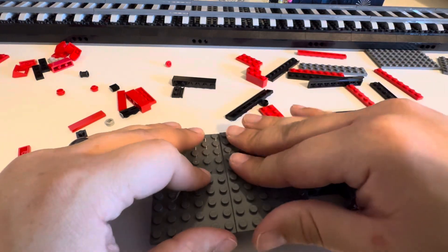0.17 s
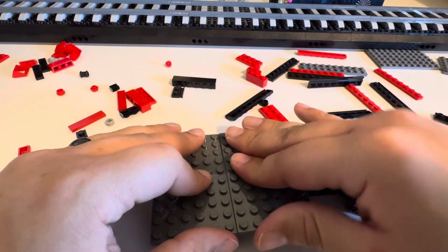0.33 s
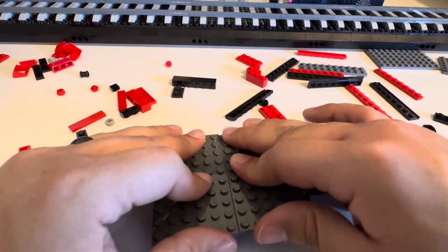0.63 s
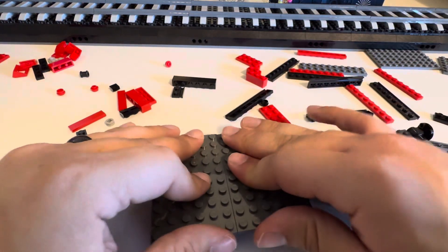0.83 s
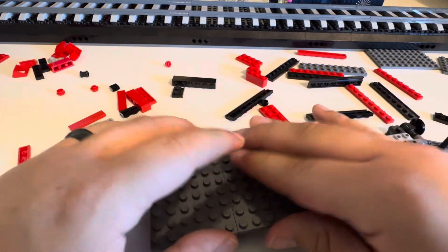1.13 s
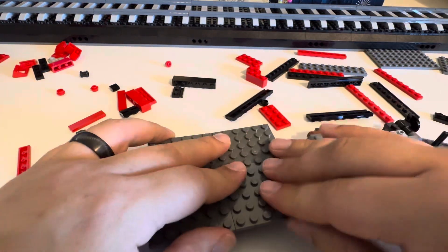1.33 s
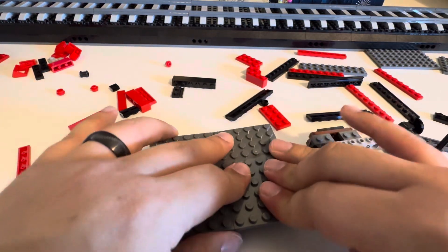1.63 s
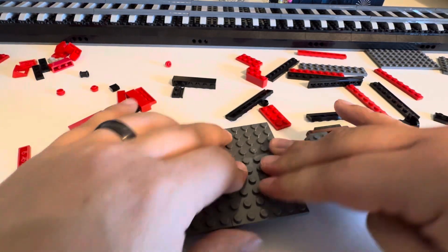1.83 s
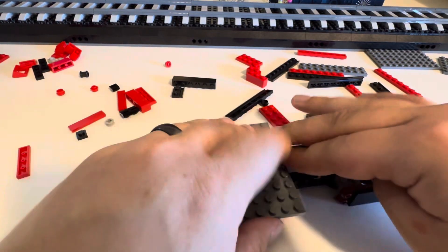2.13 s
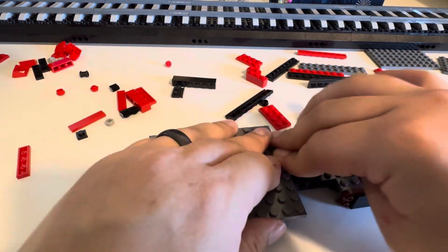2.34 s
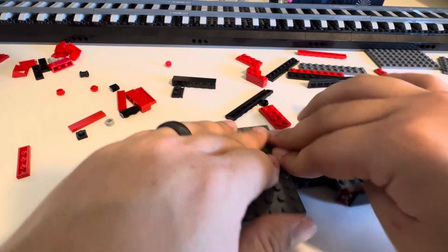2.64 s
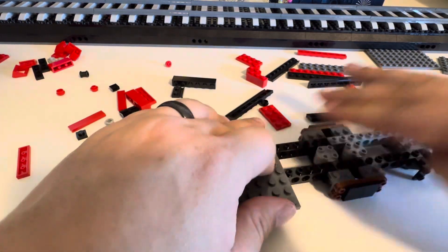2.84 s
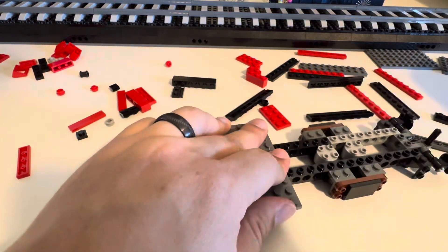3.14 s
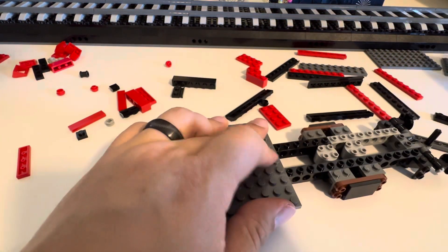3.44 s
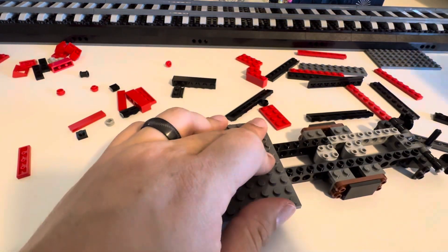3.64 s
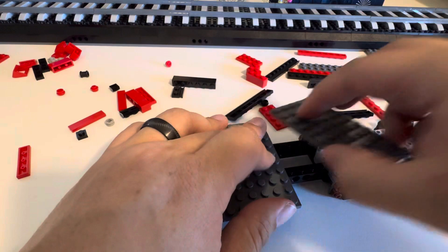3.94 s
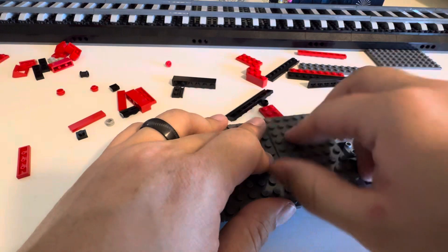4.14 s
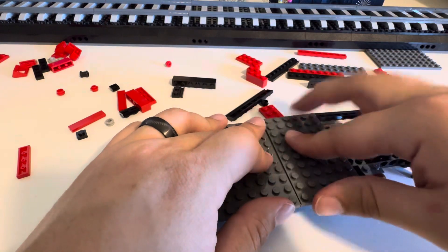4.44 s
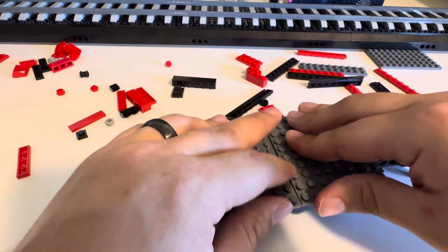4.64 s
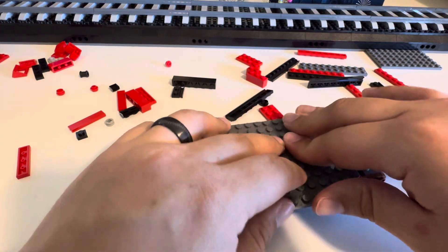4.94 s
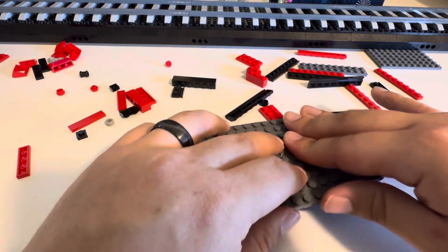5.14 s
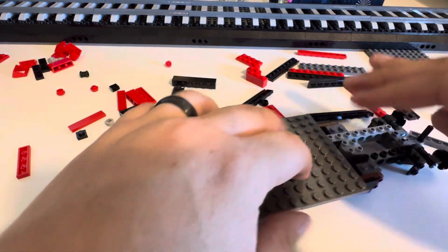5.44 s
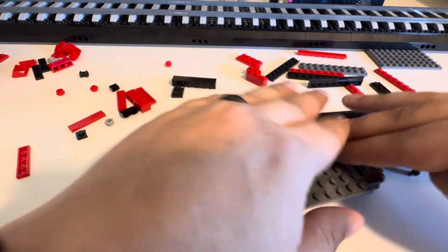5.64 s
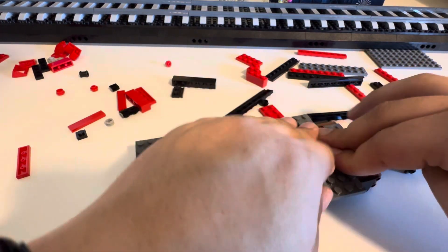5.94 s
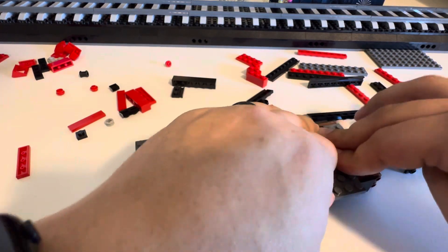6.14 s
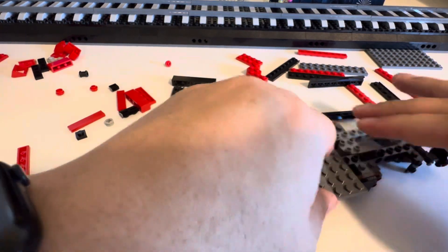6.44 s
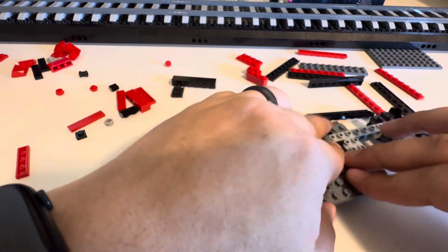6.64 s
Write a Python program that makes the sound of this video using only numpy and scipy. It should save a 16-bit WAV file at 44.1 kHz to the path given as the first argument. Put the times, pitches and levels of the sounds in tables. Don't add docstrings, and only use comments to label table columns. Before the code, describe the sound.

Fingers rub and shift hard plastic pieces on a hollow tabletop. A tiny squeak leads into a bright, startling crack and boom, answered briefly by the walls. Scattered ticks and taps continue quietly until another plate clacks down in a quick cluster, followed by a duller press, a table knock and fading light clicks. Close, dry stereo pickup, quiet indoor background.

```python
import sys
import numpy as np
from scipy import signal
from scipy.fft import rfft, irfft
from scipy.io import wavfile
from scipy.ndimage import uniform_filter1d, minimum_filter1d

SR = 44100
rng = np.random.default_rng(int(sys.argv[2]) if len(sys.argv) > 2 else 0)


def store_wav(level_fs):
    pcm = np.round(np.clip(np.atleast_2d(level_fs), -1, 1) * 32767)
    wavfile.write(sys.argv[1], SR, pcm.T.astype(np.int16))


def natural_amplitude(level_db):
    exponent = np.asarray(level_db, float) / 20
    return 10 ** exponent


N = 299439

# f/Hz, level/dB, t60/s
PLATE = [(583, 9, 0.017), (552, -6.5, 0.067), (771.5, -2.5, 0.0043), (1086.5, 5.5, 0.024),
         (1352, 2.5, 0.016), (1566, -0.5, 0.017), (1970, 0, 0.019), (2275, -5, 0.054)]
# f/Hz, level/dB, t60/s
TABLE = [(63.6, -12, 0.28), (102, 5, 0.21), (116.15, 0.5, 0.54), (196.4, 0, 0.12), (276, 6, 0.2),
         (310, -2, 0.19), (383, 1.5, 0.19), (457, -7, 0.33)]
# t/s, level/dB
CRACKS = [
    (0.6278, 23),
    (4.103, 8.5),
    (4.812, -1),
]


def evened(x):
    return x / np.sqrt(np.mean(x ** 2) + 1e-20)


def read(points, hz):
    f, value = np.transpose(points)
    return np.interp(np.log(hz + 1), np.log(f + 1), value)


def colour(x, points):
    gain = natural_amplitude(read(points, np.fft.rfftfreq(x.shape[-1], 1 / SR)))
    return irfft(rfft(x) * gain, x.shape[-1])


def add(mix, s, sound):
    part = mix[:, max(round(s * SR), 0):][:, :sound.shape[-1]]
    part += sound[..., :part.shape[1]]


def above(x, edge_hz):
    return signal.lfilter(*signal.butter(2, edge_hz, "high", fs=SR), x)


def near(modes, tone_hz, slope_db):
    return -slope_db * abs(np.log2(np.transpose(modes)[0][:, None] / tone_hz))


def ring(modes, draw, detune, spread_db, extra_db=0, length=1):
    hz, db, t60 = np.transpose(modes)[:, :, None]
    t = np.arange(SR // 4) / SR
    for_level, for_pitch = draw[:, :, None]
    decay_db = 60 * t / (t60 * max(length, .1))
    level = natural_amplitude(db + extra_db + spread_db * (2 * for_level - 1) - decay_db)
    tones = np.sin(2 * np.pi * hz * (1 + detune * (2 * for_pitch - 1)) * t)
    return (level * tones).sum(0), t


def floor():
    # f/Hz, level/dB
    air_colour = [(18, -49), (30, 13), (118, 6.5), (158, -3.5), (241, -3.5), (747, -14.5), (4980, -22.5),
                  (7020, -36.5), (9890, -25), (14700, -29), (16300, -34)]
    # f/Hz, correlation
    likeness = [(60, 0.92), (380, -0.16), (2380, -0.04), (15000, 0.74)]
    left, other = rfft(rng.standard_normal((2, N)))
    hz = np.fft.rfftfreq(N, 1 / SR)
    same = np.clip(read(likeness, hz), -1, 1)
    right = same * left + np.sqrt(1 - same ** 2) * other
    air = np.array([left, right]) * natural_amplitude(read(air_colour, hz))
    return natural_amplitude(-74 + 8.0) * evened(irfft(air, N))


def room(x):
    # f/Hz, level/dB
    wall_shine = [(2400, 0), (3200, 2.5)]
    # f/Hz, t60/s
    dying = [(80, 0.25), (210, 0.44), (560, 0.3), (1470, 0.44), (3880, 0.47), (7000, 0.35), (11000, 0.45)]
    # f/Hz, level/dB
    wall_tone = [(45, -16), (100, 8.5), (500, 4.5), (1100, 1.5), (2000, -4.5), (3500, -7.5), (6500, -3.5),
                 (9000, -4.5), (11000, -19.5), (15000, -18.5)]
    out, count = np.zeros((2, N)), SR // 2 // 20
    sources = [x[0], x[1], x.mean(0)]
    for k in range(3):
        taps = np.zeros((2, SR // 2 + 600))
        at = 420 + np.arange(count) * 20 + rng.integers(0, 20, (2, count))
        strength = 1 - 0.07 * np.exp((420 - at) / 440.0)
        np.put_along_axis(taps, at, rng.choice([-1., 1.], at.shape) * strength, 1)
        hz, t, z = signal.stft(taps, SR, nperseg=256)
        z *= natural_amplitude(read(wall_shine, hz))[:, None]
        same = read([(100, .85), (300, .4), (700, -.5), (1300, .2), (2400, -.1)], hz)[:, None]
        z[1] = same * z[0] + np.sqrt(1 - same ** 2) * z[1]
        level_db = read(wall_tone, hz)[:, None] - 60 * t / read(dying, hz)[:, None]
        tail = signal.istft(z * natural_amplitude(level_db), SR, nperseg=256)[1]
        tail = tail / np.linalg.norm(tail[0])
        turn = np.sqrt(2 / 3) * np.cos(np.pi * (np.arange(N) / SR * 3.3 + k / 3))
        out += signal.fftconvolve((turn * sources[k])[None], tail, axes=1)[:, :N]
    return out


def crack():
    # f/Hz, level/dB
    crack_colour = [(500, -33.5), (1400, -12.5), (2200, -11.5), (3000, -3.5), (4500, -6.5), (6500, -11.5),
                    (9000, -10.5), (12000, -17)]
    out = np.zeros((2, N))
    pulse = colour(1. * (np.arange(1024) == 512), crack_colour)
    for s, db in CRACKS:
        add(out, s - 512 / SR, natural_amplitude(db) * pulse)
    return out


def thuds():
    # t/s, peak level/dB, strongest tone f/Hz, ring length/factor
    blows = [(0.387, -63.5, 410, 1), (0.64, -15, 298, 0.58), (0.638, -15.5, 96.9, 0.52),
             (1.058, -33, 286, 1), (1.178, -42, 95.5, 0.45), (1.296, -33.5, 93, 0.55),
             (1.592, -31.5, 113, 0.77), (1.794, -38, 114, 1), (1.926, -34, 276, 1),
             (2.179, -34.5, 90, 0.57), (2.209, -31, 85.3, 0.19), (2.442, -42, 310, 1), (2.69, -38, 393, 1),
             (2.766, -28, 286, 0.64), (2.989, -42, 116.4, 0.14), (3.317, -48.5, 77.8, 0.98),
             (3.389, -39, 111, 1), (3.43, -40, 287, 1), (4.007, -53.5, 396, 0.9), (4.101, -20, 285, 0.71),
             (4.326, -36.5, 111.8, 0.37), (4.441, -42, 109, 0.31), (4.811, -11, 234, 0.39),
             (5.199, -32, 310, 0.81), (5.238, -35.5, 113, 1), (5.638, -20, 269.5, 0.89),
             (6.049, -41, 315, 1), (6.174, -44, 120, 0.94), (6.297, -33, 322, 1), (6.326, -35, 119, 0.97),
             (6.568, -29.5, 118, 0.47)]
    swell_cycles = 0.22
    out = np.zeros((2, N))
    for (s, db, tone_hz, length), draw in zip(blows, rng.random((len(blows), 2, len(TABLE)))):
        boom, t = ring(TABLE, draw, 0.06, 3.5, near(TABLE, tone_hz, 6), length)
        boom *= 1 - np.exp(-t * tone_hz / swell_cycles)
        add(out, s, natural_amplitude(db - 1.5) * boom / abs(boom).max())
    return out


def strokes():
    # start t/s, length/s, force level/dB, weight on the table/dB, skin sliding/dB
    drags = [(-.05, 0.066, -43.5, -8.5, -9), (0.302, 0.27, -69, 5, -16.5), (0.757, 0.25, -51.5, 2, -5),
             (1.043, 0.091, -52, -3.5, 8), (1.289, 0.13, -65.5, 6, 13), (1.508, 0.19, -64, 3, 6.5),
             (1.768, 0.18, -55.5, -6.5, -2), (1.994, 0.14, -53, 2.5, 0.5), (2.244, 0.45, -60, -9.5, 0.5),
             (2.634, 0.17, -49.5, -10.5, -3), (2.893, 0.38, -61.5, -9.5, 4), (3.329, 0.11, -58, -3.5, 4.5),
             (4.153, 0.092, -59.5, -2, 10), (4.318, 0.69, -67.5, 4, -16), (4.851, 0.42, -65, 0, 0),
             (5.168, 0.19, -53.5, -1.5, 2.5), (5.388, 0.09, -58.5, 4.5, -14.5),
             (5.703, 0.24, -70.5, 7.5, 6.5), (5.912, 0.19, -61.5, -1, -3), (6.157, 0.2, -65, 2, -0.5),
             (6.269, 0.089, -54, 6, -9.5), (6.444, 0.13, -51.5, -15.5, 1.5),
             (6.667, .15, -56.5, -15, -11.5)]
    grip_s, let_go_s, skin_all_db = .02, 0.063, -20.5
    start, length, db, weight_db, skin_db = np.transpose(drags)[:, :, None]
    t = np.arange(0, N + 256, 256) / SR
    grip = np.clip((t - start) / grip_s, 0, 1)
    shape = grip * np.exp(-np.maximum(t - start - length, 0) / let_go_s)
    shares = weight_db, 0, skin_db + skin_all_db
    return [np.interp(np.arange(N) / SR, t, (shape * natural_amplitude(db + share)).sum(0)) for share in shares]


def slips(per_s, spread_db, clump_db):
    clumps = evened(uniform_filter1d(uniform_filter1d(rng.standard_normal(N), 500), 500))
    size = natural_amplitude(spread_db * np.minimum(rng.exponential(1, N), 4) + clump_db * clumps)
    return size * rng.choice([-1., 1.], N) * (rng.random(N) < per_s / SR)


def drag():
    # f/Hz, level/dB
    skin_colour = [(1650, -30), (2800, -7), (3730, -2.5), (9520, -16.5), (11300, 4.5), (12700, -17),
                   (14100, -2), (15300, -23), (16300, -55.5)]
    load, scrape, rub = strokes()
    still = np.full((2, len(PLATE)), .5)
    table_ring = ring(TABLE, still, 0, 0, near(TABLE, 100, 0.87), 0.18)[0]
    table = evened(signal.oaconvolve(slips(1500, 1.3, 2.7), table_ring)[:N])
    table = colour(table, [(420, 1.5), (700, -20.5)])
    plate_ring = ring(PLATE, still, 0, 0, near(PLATE, 570, 1.0), 0.23)[0]
    middle, side = [evened(signal.oaconvolve(slips(2700, 0.92, 3.7), plate_ring)[:N]) for _ in range(2)]
    plate = 0.47 * middle + np.outer([.5, -.5], side)
    middle, side = [evened(colour(slips(7000, 3, 2.5), skin_colour)) for _ in range(2)]
    hiss = natural_amplitude(4.0) * rub * (middle + np.outer([.4, -.4], side))
    return load * table + scrape * plate + hiss


def pings():
    # t/s, peak level/dB, f/Hz, t60/s
    bricks = [(1.03, -66, 2140, 0.36), (1.058, -48.5, 3100, 0.036), (1.416, -46.5, 3250, .035),
              (1.952, -50, 1282, 0.13), (4.012, -49.5, 2450, 0.11), (4.125, -35, 4080, .012),
              (4.148, -25, 4200, .012), (4.213, -28.5, 1697, 0.028), (4.812, -28, 1140, .07),
              (5.235, -47.5, 1015, 0.2), (6.47, -48, 572, .08), (6.557, -45.5, 556.4, 0.046),
              (5.629, -45, 4960, .02), (5.697, -43.5, 3080, 0.037), (6.47, -52, 4555, 0.026),
              (6.59, -56, 2820, 0.045)]
    out, t = np.zeros((2, N)), np.arange(SR // 4) / SR
    for (s, db, hz, t60), noise in zip(bricks, rng.standard_normal((len(bricks), len(t)))):
        wobble = 1 + .5 * evened(uniform_filter1d(noise, 150))
        level = natural_amplitude(db - 60 * t / max(t60, .005)) * (1 - np.exp(-t / 0.00091))
        add(out, s, level * wobble * np.sin(2 * np.pi * hz * t))
    return out


def rising_tone():
    end_s, rising_hz, rising_db, grows_s = .6262, 1770, -14.5, 0.0032
    out, t = np.zeros((2, N)), np.arange(-900, 40) / SR
    swell = np.exp(np.minimum(t, 0) / grows_s) * np.clip(1 - t * SR / 40, 0, 1)
    turns = 2 * np.pi * rising_hz * t
    tone = np.sin(turns) + natural_amplitude(-27.5) * np.sin(3 * turns) + natural_amplitude(-30.0) * np.sin(4.3 * turns)
    add(out, end_s + t[0], natural_amplitude(rising_db) * swell * tone)
    return out


def knocks():
    # t/s, peak level/dB, strongest upper tone f/Hz, whole-plate flexing/dB, contact/ms
    seatings = [(0.637, -31, 2017, -22, 2), (0.6258, 0, 1395, -5, 0.95), (0.644, -19, 1130, 1.5, 2.14),
                (4.083, -24.5, 1513, 0.5, 2.7), (4.1012, -7.5, 1100, -10, 1.2), (4.112, -23, 780, -4, 1.6),
                (4.12, -32, 780, 0.5, 1.36), (4.127, -25, 1790, -10, 1.6), (4.147, -18, 1933, -16.5, 1.4),
                (4.212, -33, 1803, -18, 1.53), (4.811, -16.5, 1080, 2.5, 1.91),
                (5.622, -40.5, 769, 1, 1.86), (5.628, -20.5, 1530, -4.5, 2.96),
                (5.634, -29.5, 1114, 0, 2.43), (5.652, -28, 600, -2, 3.3), (5.645, -32.5, 1070, 3, 3),
                (6.207, -33, 1360, 1, 1.92)]
    # t/s, peak level/dB
    pushes = [(0.335, -60), (0.396, -53), (1.05, -46), (1.287, -49), (1.299, -37), (1.589, -41.5),
              (1.784, -45), (1.919, -57), (2.017, -46), (2.064, -55), (2.435, -54.5), (2.666, -44.5),
              (2.683, -43.5), (2.749, -46), (4.01, -42.5), (4.11, -44), (4.328, -50.5), (4.847, -56.5),
              (5.192, -46), (5.234, -48), (5.436, -47), (6.043, -43), (6.18, -52), (6.281, -41.5),
              (6.47, -51), (6.557, -40)]
    # t/s, peak level/dB
    nudges = [(0.147, -47), (1.028, -52), (1.06, -37), (1.35, -48), (1.498, -46.5), (2.111, -37),
              (2.166, -44.5), (2.625, -43), (2.763, -36.5), (4.402, -47.5), (4.441, -42), (5.912, -50),
              (6.3, -41), (6.686, -46)]
    # t/s, peak level/dB, strongest upper tone f/Hz
    edge_taps = [(0.422, -41, 1240), (1.143, -47.5, 1090), (1.414, -41, 939), (1.85, -47, 1530),
                 (1.951, -51.5, 1260), (2.19, -45, 936), (2.253, -50, 1056), (2.329, -45, 1080),
                 (2.973, -66, 2236), (3.347, -63.5, 2395), (3.362, -52.5, 1450), (3.392, -46.5, 1795),
                 (4.717, -49.5, 1100), (5.129, -56.5, 1153), (5.332, -56, 1060), (5.391, -45.5, 2380),
                 (5.452, -42.5, 883), (5.953, -40.5, 1457), (5.969, -37.5, 1110), (5.993, -41, 1085),
                 (6.751, -52, 2370)]
    flat_hz = 1040
    firm = 0.039
    rows = seatings + [(*row, flat_hz, 7, 3.9) for row in pushes]
    rows += [(*row, flat_hz, -1, 3.4) for row in nudges] + [(*row, -21, 2.4) for row in edge_taps]
    out = np.zeros((2, N))
    whole = np.arange(8)[:, None] < 2
    for (s, db, tone_hz, flex_db, ms), draw in zip(rows, rng.random((len(rows), 1016))):
        mode_db = np.where(whole, flex_db - 3, near(PLATE, tone_hz, 8))
        plate, t = ring(PLATE, draw[:16].reshape(2, 8), .06, 3, mode_db, .7)
        u = 1000 * t[:1000] / np.clip(ms, .3, 8)
        jolts = (draw[16:] - .5) ** 3 + firm * np.exp(-((u - .5) / .06) ** 2)
        contact = np.convolve(jolts * u * np.exp(-u), np.hanning(11))
        plate = signal.fftconvolve(plate[:4096], contact)
        add(out, s - .001, natural_amplitude(db + 3.5 + max(flex_db, 0)) * plate / abs(plate).max())
    return out


def ticks():
    # t/s, peak level/dB, ring f/Hz, left-right/dB
    sharp = [(1.1453, -33, 3600, 4.5), (1.3453, -40.5, 8190, 1), (1.8567, -36, 5090, 3),
             (1.9031, -59, 5420, 6), (1.916, -45, 3850, 7), (2.0637, -47.5, 3860, 3),
             (2.1924, -42.5, 2730, 0), (3.3448, -33.5, 3350, 10.5), (4.5476, -56, 5280, -1),
             (5.7104, -48.5, 4370, 0.0), (6.1769, -60, 3110, 1), (6.3475, -45.5, 2690, -3)]
    # t/s, peak level/dB, ring f/Hz, left-right/dB
    crisp = [(0.6262, 5, 5280, 6.5), (4.1022, -6, 6260, -5), (0.4204, -38.5, 5730, 2.5),
             (1.0261, -37, 2460, 4.5), (1.1453, -41, 3500, 2), (1.2845, -44, 3750, 6.0),
             (1.3179, -43, 2790, 3), (1.5893, -43, 4140, 9), (1.6676, -53, 3750, 5.5),
             (1.8028, -45, 4930, 1.5), (2.0154, -56, 2500, 4), (2.2518, -48, 3750, 4.5),
             (2.6774, -43, 3670, 3.5), (2.9741, -48.5, 2552, 10), (3.5144, -50, 2600, -6),
             (4.0088, -34.5, 2550, 0.5), (4.1275, -17.5, 3040, -2), (4.1465, -21.5, 2570, 3.5),
             (4.6049, -52, 2680, 4), (4.8115, -19.5, 3670, -1), (5.0903, -56.5, 2630, 2),
             (5.219, -36, 7200, -1.5), (5.2304, -40.5, 3250, 1.5), (5.6136, -42.5, 2680, -1),
             (5.9708, -57, 2590, -1.5), (6.2063, -35.5, 2610, 2.0), (6.334, -48, 2690, -1.0)]
    # t/s, peak level/dB, ring f/Hz, left-right/dB
    soft = [(0.145, -54, 3530, 7.5), (0.3985, -55.5, 2510, 3.5), (1.297, -35, 3740, 3),
            (1.4126, -40.5, 3300, 7), (1.4935, -44.5, 5020, 6.5), (2.1131, -49, 2500, 4),
            (2.3295, -51, 5230, 5.5), (2.6184, -42, 4360, 6.5), (2.6527, -48.5, 2500, 5),
            (2.745, -50, 2500, 1.0), (2.7613, -43.5, 2540, 3), (3.2919, -70, 2610, 0.0),
            (3.3613, -30, 3500, 7), (3.3922, -44.5, 4310, -1), (4.1269, -27, 3100, 15),
            (4.4363, -48, 2500, 8.5), (4.6922, -58, 3710, 6.5), (4.7167, -49, 2940, -2),
            (4.9569, -55.5, 2530, 2.5), (5.1883, -46.5, 2910, 9), (5.3892, -47.5, 2460, 9),
            (5.644, -37.5, 2710, 0.0), (5.695, -35, 3010, 1.5), (5.9555, -52.5, 2610, 1.5),
            (6.4702, -50.5, 4410, 19), (6.5542, -48.5, 2670, -5.5)]
    # t/s, peak level/dB, ring f/Hz, left-right/dB
    dull = [(1.0463, -40, 2470, 9), (4.0821, -24.5, 3650, -4.5), (4.2107, -41, 2660, 6),
            (5.4488, -55, 2520, 0.5), (5.6276, -39.5, 2690, 1.5), (6.2829, -45, 2920, 12),
            (6.6833, -46.5, 4100, 3), (6.7314, -56, 3440, 7), (6.7508, -43.5, 2430, 10),
            (6.769, -55.5, 2460, 14)]
    # f/Hz, level/dB
    snap_colour = [(1060, -35.5), (1800, -8), (3400, -12), (4700, -16.5), (7800, -27.5), (11500, -11.5),
                   (15000, -18.5), (16600, -17.5)]
    ring_db, ring_oct = 7.5, 0.082
    out, t = np.zeros((2, N)), (np.arange(2048) - 512) / SR
    kinds = (sharp, 8), (crisp, -0.43), (soft, -5), (dull, -15)
    rows = [(*row, bright_db) for table, bright_db in kinds for row in table]
    for (s, db, ring_hz, pan_db, bright_db), noise in zip(rows, rng.standard_normal((len(rows), 2, 2048))):
        u = t / (.0028 * natural_amplitude(1.0 * noise[0, 0] - .3 * (db + 36))) - .2
        build_up = np.exp(1.5 * np.minimum(u - .7, 0))
        shape = np.where(u < .7, build_up, np.exp(.7 - u) + .06 * np.exp(-t / .008))
        own = colour(noise[1], [(1500, -27.5), (2500, -4), (7000, 2), (9000, -25.5)])
        burst = shape * (noise[0] + np.outer([1, -1], own))
        burst = colour(colour(burst, snap_colour), [(5000, 0.0034), (9000, bright_db + 7.0)])
        skirt = 2 ** (2 * ring_oct)
        burst = colour(burst, [(ring_hz / skirt, 0), (ring_hz, ring_db), (ring_hz * skirt, 0)])
        left, right = [colour(burst[k], [(6000, side * pan_db), (8000, 0.0015)])
                       for k, side in enumerate((.5, -.5))]
        burst = np.array([left, right])
        add(out, s - 512 / SR, natural_amplitude(db + 4.0) * burst / abs(burst).max())
    return out


def ports(x):
    # f/Hz, phase/rad
    lead = [(0, 0), (400, .6), (700, 1.3), (1100, .9), (1600, 1.2), (3200, 3), (6000, 6.5), (8200, 6.6),
            (9650, 3), (11600, -.9), (14400, -7.6), (16000, -9.4)]
    half = read(lead, np.fft.rfftfreq(N, 1 / SR)) / 2
    return irfft(rfft(x) * np.exp(1j * np.array([half, -half])), N)


def scene():
    studs, plates, rising = ticks(), above(knocks(), 90), rising_tone()
    boom, rubbing = above(thuds(), 35), drag()
    around_crack = (abs(np.arange(N) / SR - np.array(CRACKS)[:, :1]) < .006).any(0)
    seen = studs * np.where(around_crack, .15, 1) + .2 * rising
    wet = natural_amplitude(-11.5) * room(seen + plates + crack() + 0.65 * boom + 0.21 * rubbing)
    close = ports(studs + plates + rising + boom + rubbing + pings())
    return close + wet + floor()


def band_limit(x):
    return signal.sosfilt(signal.butter(12, 16460, fs=SR, output="sos"), x)


def record(dry):
    # f/Hz, level/dB
    capsule = [(30, -12.5), (55, -2), (9200, 1.5), (10000, 0), (10800, -3), (12000, -4.5), (12500, -18.5),
               (13000, -20.5), (13600, -4.5), (14800, 2), (15800, -13.5)]
    limit = 0.24
    x = signal.oaconvolve(colour(dry, capsule), signal.firwin(255, 16700, fs=SR)[None], "same")
    peak = -minimum_filter1d(-abs(x).max(0), 200)
    over = uniform_filter1d(np.log(np.maximum(peak / limit, 1)), 150)
    return band_limit(np.clip(x * np.exp(-.45 * over), -1, 1))


dry = scene()
out = record(dry)
store_wav(out)
```